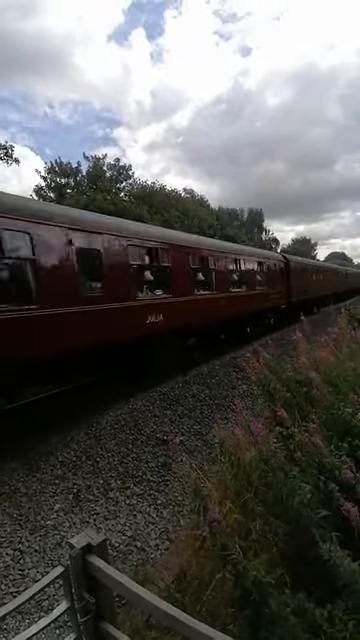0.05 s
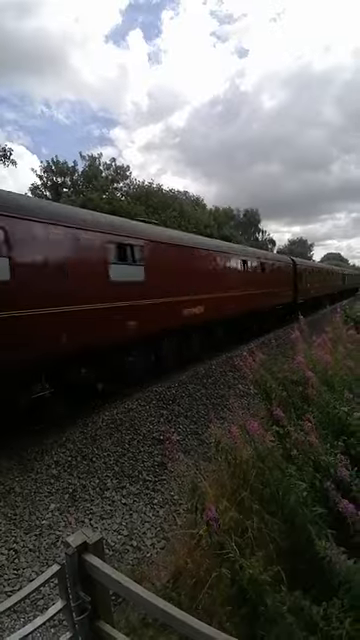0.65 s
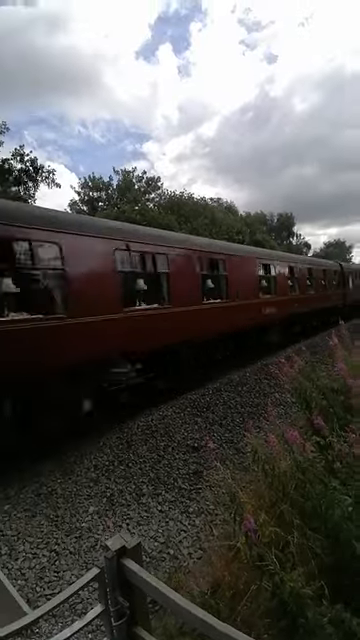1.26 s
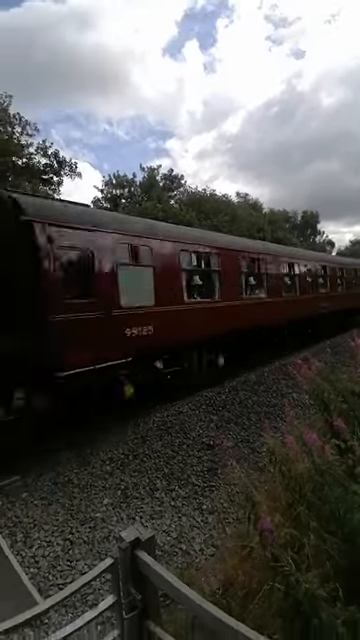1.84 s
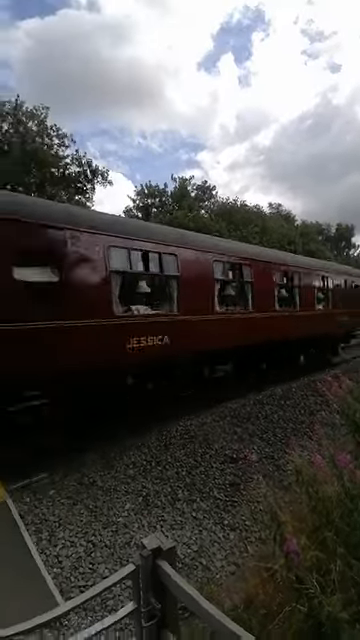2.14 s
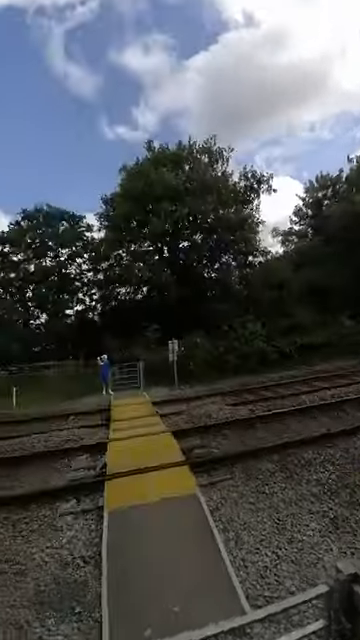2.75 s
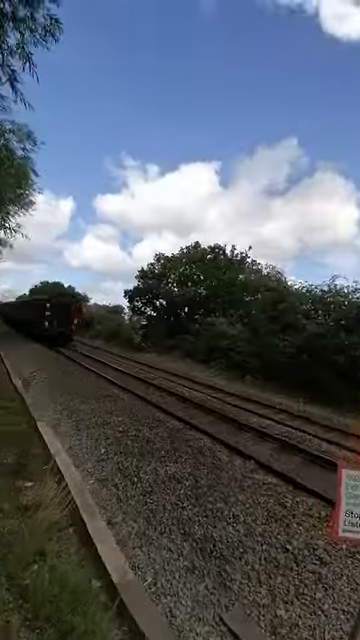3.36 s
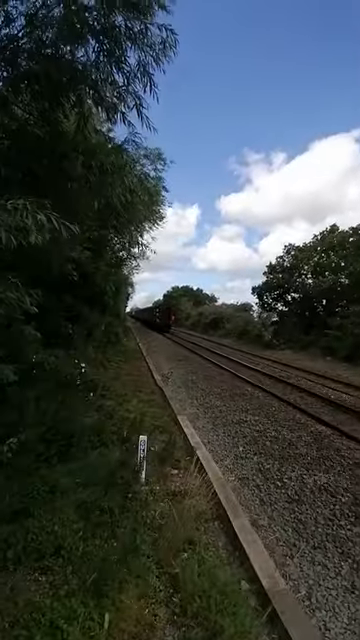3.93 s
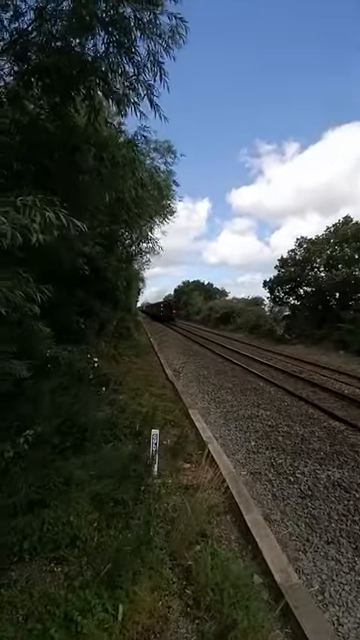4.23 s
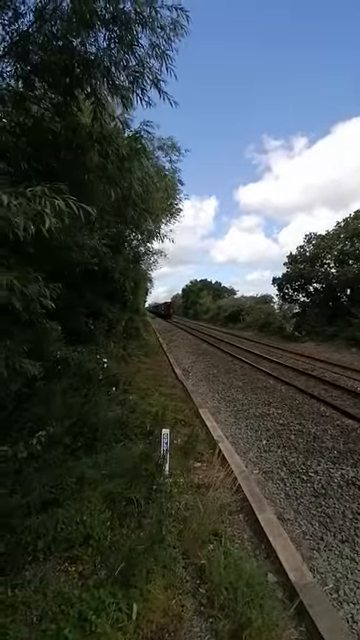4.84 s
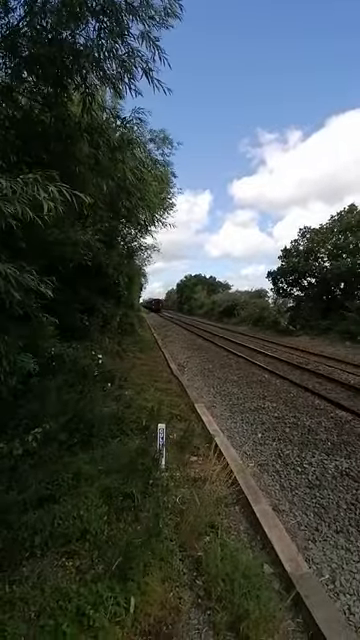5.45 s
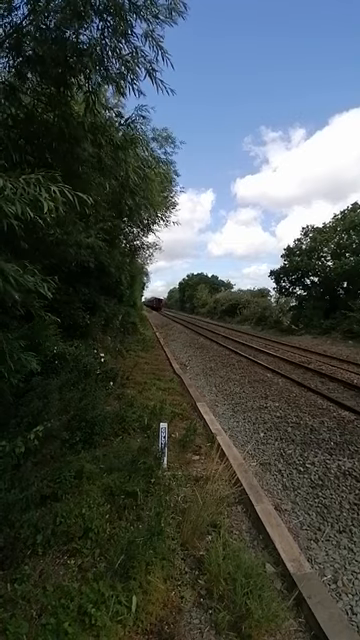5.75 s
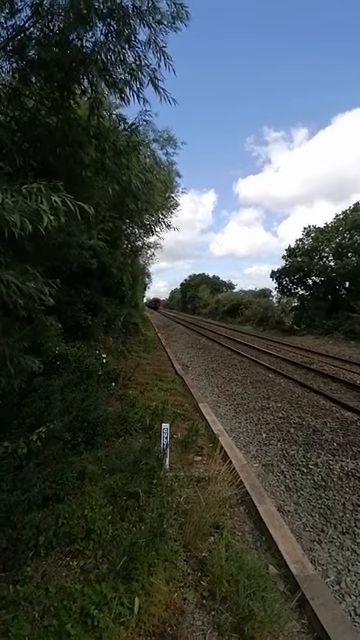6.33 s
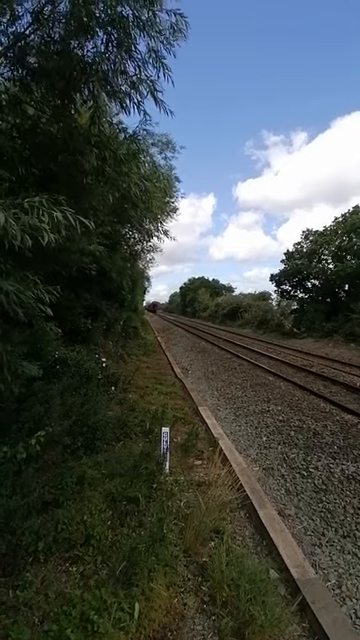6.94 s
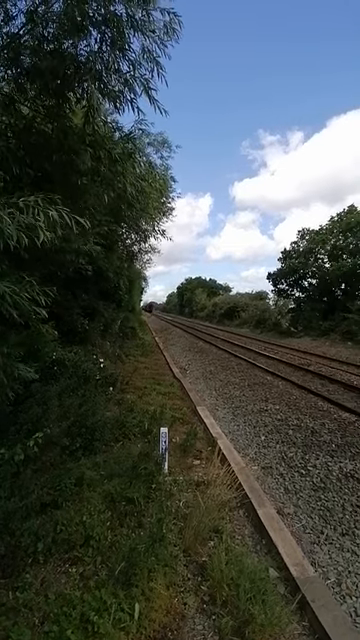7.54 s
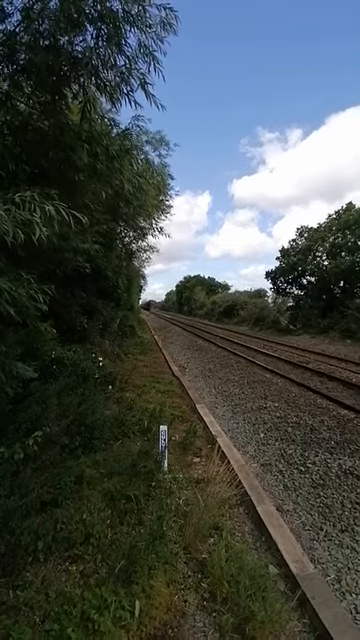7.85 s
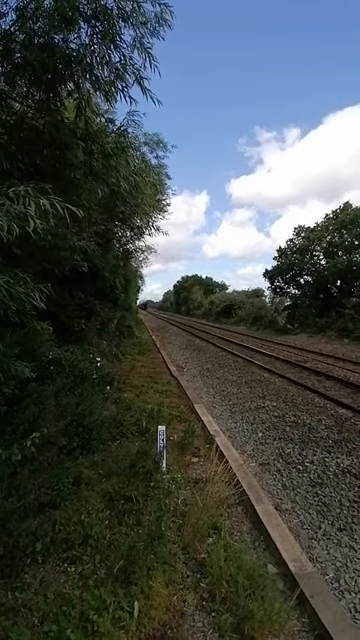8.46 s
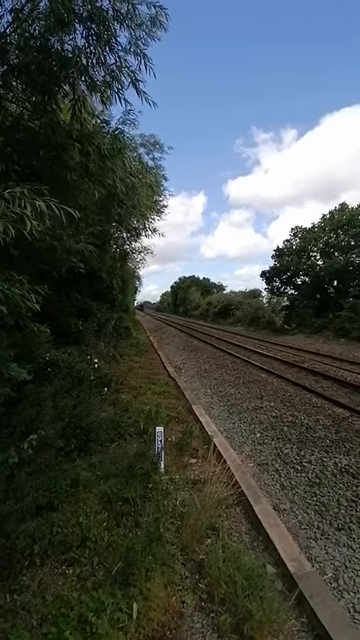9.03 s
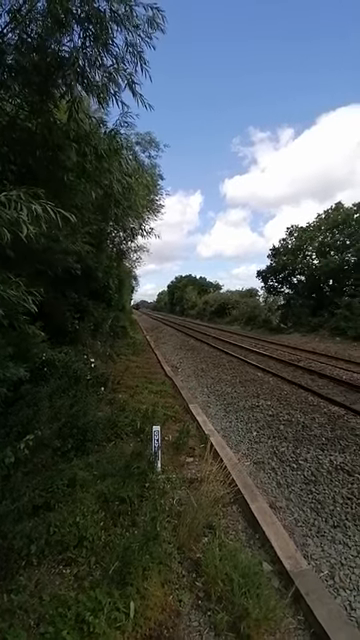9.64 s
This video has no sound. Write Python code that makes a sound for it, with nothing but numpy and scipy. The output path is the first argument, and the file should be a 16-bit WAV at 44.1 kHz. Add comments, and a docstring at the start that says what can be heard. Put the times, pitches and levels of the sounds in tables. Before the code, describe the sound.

Railway coaches rush past a few metres away, roaring and rumbling while their wheels hiss and ring in quick, falling tones. After about three seconds the last coach goes by with a soft boom and a few dull knocks. The noise then dulls and fades along the open track, throbbing slightly while the rails keep singing. Light wind buffets the microphone and is left rumbling beside the distant train.

```python
"""Railway coaches rush past a few metres away, their rough wheels driving rails and sleepers into a roar.
Bogie after bogie sweeps by, its ringing wheels falling in pitch by the Doppler effect.
The end of the last coach booms and the last wheels knock. As the train recedes the sound dulls
and throbs with the turning wheels, while the rails, acting as waveguides, keep singing.
A light wind, buffeting the microphone throughout, is left rumbling beside the distant train."""
import sys
import numpy as np
from scipy import signal
from scipy.fft import irfft, next_fast_len
from scipy.io import wavfile

SR = 44100
rng = np.random.default_rng(int(sys.argv[2]) if len(sys.argv) > 2 else 0)


def store_pcm(level_fs):
    """Save levels as 16-bit WAV."""
    pcm = np.round(np.clip(level_fs, -1, 1) * 32767).astype(np.int16)
    wavfile.write(sys.argv[1], SR, np.atleast_2d(pcm).T)


N = 427329
TIME = np.arange(N) / SR
SIZE = next_fast_len(N, real=True)
HZ = np.maximum(np.arange(SIZE // 2 + 1) * SR / SIZE, 1)
TRAIN_SPEED, SOUND_SPEED = 28.0, 343   # m/s
TRACK_DISTANCE_M, LAST_COACH_S = 4.5, 2.605
RECEDED_M = TRAIN_SPEED * np.maximum(TIME - LAST_COACH_S, 0)

# stereo field beside the train: (frequency [Hz], coherence [0-1], left minus right [dB])
NEAR_IMAGE = [(60, 0.87, 0), (250, 1, -1), (726, 0.95, -3), (1420, 0.44, 1.5), (2340, 0.26, 0.5),
              (3980, 0.01, 2.5), (14000, .05, -2.5)]
# stereo field of the distant train: (frequency [Hz], coherence [0-1], left minus right [dB])
FAR_IMAGE = [(60, .6, 10), (200, 0.95, 7.5), (370, 0.89, -2), (706, 0.85, -1), (1210, 0.58, 0.5),
             (4300, 0.19, -3.5), (8000, .08, 2)]
# phase lead of the right channel, near sound: (frequency [Hz], lead [rad])
NEAR_LEAD = [(60, 0.4), (800, 0.39), (2500, 0.81), (4200, 1.8)]
# phase lead of the right channel, far sound: (frequency [Hz], lead [rad])
FAR_LEAD = [(800, .1), (1100, .4), (1400, 2.37), (1750, 3.44), (2700, 1.3), (3300, 0.3), (4200, 3.9)]

# spectrum of wind on the microphone: (frequency [Hz], level [dB])
WIND_SPECTRUM = [(20, -1), (100, -1), (150, -5), (260, -33.5)]
# puffs of wind: (time [s], half-duration [s], level [dB])
WIND_PUFFS = [(0.142, 0.4, -50), (0.79, 0.38, -43), (2.095, 0.84, -49.5), (3.483, 0.044, -54),
              (4.13, 0.08, -58), (4.55, 0.13, -61), (4.843, 0.052, -54), (5.34, 0.022, -48),
              (5.804, 0.29, -52), (7.0, 0.9, -51.5), (8.367, 0.07, -50), (8.963, 0.087, -54),
              (9.557, 0.044, -49)]
# spectrum of the rumbling coach bodies: (frequency [Hz], level [dB])
BODY_SPECTRUM = [(100, -13.5), (150, -8.5), (210, -3), (480, -11.5)]
# low rumble from down the line: (time [s], level [dB])
FAR_RUMBLE_LEVEL = [(4.3, -61), (5.35, -63.5), (5.9, -52), (7.6, -48.5), (9.69, -52.5)]
# sleepers bouncing on the ballast: (frequency [Hz], half-width [Hz], level [dB])
SLEEPER_MODES = [(466, 92, 1.5), (330, 20, -16)]
# relative levels as coach ends go by, the wheels of each running differently:
# (time [s], body rumble [dB], track roar [dB], wheel hiss [dB], contact sizzle [dB], sleeper drone [dB])
COACH_ENDS = [(.13, -43, -20, -35, -45.5, -31.5), (0.759, -39, -19.5, -29.5, -45, -32.5),
              (1.45, -39, -20, -29.5, -45.5, -39), (2.08, -41, -17.5, -30, -48, -35),
              (2.75, -41, -21, -29, -47.5, -30.5)]
# swells of the distant train: (time [s], half-duration [s], roar boost [dB], rail song boost [dB])
FAR_SWELLS = [(4.4, 0.46, 2, 4), (5.594, 0.44, 2.5, 4.5), (6.42, 0.48, 3, 1), (6.937, 0.24, 3, 2),
              (7.354, 0.38, 3, 2.5)]
# brief throbs of the receding roar: (time [s], boost [dB])
ROAR_THROBS = [(3.53, 3.5), (3.771, 4), (3.96, 1.5), (4.29, 2.5), (5.272, 5), (6.841, 2), (6.941, 1.5),
               (8.245, 4.5)]

# spectrum of the track roar from afar: (frequency [Hz], level [dB])
FAR_ROAR = [(200, -44), (270, -19.5), (380, -31), (440, -14), (600, 0), (700, -5), (800, 0.5), (880, -2.5),
            (970, -10.5), (1020, -10), (1200, -20.5), (1600, -39)]
# resonances of the track: (frequency [Hz], half-width [Hz], level [dB])
TRACK_MODES = [(647, 22, -4.5), (676.4, 10, -1), (737.4, 5, 3.5), (761.6, 26, -1), (949, 13, -5)]
# spectrum of the rail song from afar: (frequency [Hz], level [dB])
FAR_RAIL = [(950, -24), (1130, -6.5), (1400, 1), (1500, -16.5), (1650, -19), (2100, -20)]
# lower rail tones: (frequency [Hz], half-width [Hz], level [dB])
LOW_RAIL_MODES = [(1208, 11, -3), (1220, 24, -2.5)]
# higher rail tones: (frequency [Hz], half-width [Hz], level [dB])
HIGH_RAIL_MODES = [(1362, 13, -3.5), (1408, 10, -8.5), (1444, 9.1, -10), (1870, 8, -19)]
# strength of the higher tones within the rail song: (time [s], level [dB])
HIGH_RAIL_LEVEL = [(4.7, -3.5), (5.0, -14), (5.12, 0.5)]
# spectrum of the wheel hiss from afar: (frequency [Hz], level [dB])
FAR_HISS = [(1200, -22.5), (1550, 5.5), (1900, 1), (2250, -6), (2800, -5.5), (3150, -9.5), (3500, -7.5),
            (4100, -16), (5500, -43.5)]
# spectrum of the contact sizzle from afar: (frequency [Hz], level [dB])
FAR_SIZZLE = [(3300, -22.5), (4200, 0.5), (6350, -4), (7400, -3), (8200, -12.5), (9300, -14), (10200, -21),
              (15000, -27.5)]
# whine carried by the rails: (frequency [Hz], half-width [Hz], level [dB])
FAR_WHINE_MODES = [(6670, 100, 1.5), (6810, 120, 2)]
# rail whine in the far treble, outlasting the airborne sizzle: (time [s], power share [0-1])
WHINE_SHARE = [(3.3, 0.06), (4.4, 0.14), (6.9, 0.5), (7.6, 0.25)]

# spectrum of the track roar alongside: (frequency [Hz], level [dB])
NEAR_ROAR = [(200, -42.5), (330, -18.5), (410, -17.5), (540, -10), (640, -1.5), (750, -2), (850, 3),
             (990, -1), (1200, -9), (1600, -40.5)]
# spectrum of the rail song alongside: (frequency [Hz], level [dB])
NEAR_RAIL = [(950, -53.5), (1170, -6), (1300, 0), (1450, -4), (1580, -9.5), (1900, -28.5)]
# spectrum of the wheel hiss alongside: (frequency [Hz], level [dB])
NEAR_HISS = [(1300, -26.5), (1620, 1.5), (1900, 3), (2400, -8), (3100, -15), (3600, -13), (4200, -20.5),
             (5500, -24.5)]
# spectrum of the contact sizzle alongside: (frequency [Hz], level [dB])
NEAR_SIZZLE = [(3300, -20), (4200, -12), (5700, 2), (6800, -1.5), (9200, -11.5), (10200, -21), (11500, -20),
               (15000, -42.5)]
# thin steel whine alongside: (frequency [Hz], half-width [Hz], level [dB])
NEAR_WHINE_MODES = [(5800, 40, -5.5), (5600, 200, -10.5)]
# high band of the scuffing wheels: (frequency [Hz], half-width [Hz], level [dB])
SCUFF_BAND = [(4740, 830, 0)]
# strength of the scuffing: (time [s], level [dB])
SCUFF_LEVEL = [(.43, -68), (.55, -50), (1.25, -50.5), (2.7, -53), (4.6, -84)]

# knocks of the last wheels: (time [s], level [dB])
WHEEL_KNOCKS = [(2.913, -20), (2.95, -21), (3.235, -20), (3.287, -22), (3.324, -20)]
# howling wheels, and last a broad swell of the distant train's hiss: (time [s], frequency [Hz], half-width
# [Hz], level [dB], half-duration [s])
WHEEL_HOWLS = [(.98, 6700, 650, -50, 0.1), (1.337, 922, 163, -20, 0.2), (2.387, 3880, 170, -47, 0.11),
               (2.687, 2400, 1010, -34, 0.085), (2.983, 990, 150, -24, 0.32), (4.103, 1780, 386, -48, 0.46)]
# ringing wheels: (time [s], frequency [Hz], level [dB], half-duration [s], relative glide [1/s])
WHEEL_RINGS = [(0.25, 1300, -20.5, 0.018, -0.056), (0.517, 1480, -26, 0.052, -0.14),
               (1.097, 3360, -38, 0.1, -0.12), (1.381, 1354, -18.5, 0.088, -0.07),
               (1.55, 3480, -42, 0.043, -.15), (1.888, 1457, -16.5, 0.032, -0.5),
               (2.26, 3460, -39, .04, -0), (2.483, 2500, -36, .045, -.3), (2.601, 3610, -37, 0.04, -0.4),
               (2.873, 1007, -22.5, 0.11, 0.026)]
# boom of the last coach's end wall: (frequency [Hz], half-width [Hz], level [dB])
END_WALL_MODES = [(203, 22, -9.5), (278, 17, -0.5), (328, 54, -7.5)]
# resonances of a wheel: (frequency [Hz], half-width [Hz], level [dB])
WHEEL_MODES = [(736, 100, -7), (830, 31, -10.5), (1393, 41, 4.5), (3850, 29, -11.5)]
# bright rush of a wheel: (frequency [Hz], half-width [Hz], level [dB])
WHEEL_RUSH_BANDS = [(2450, 460, 5.5), (3250, 560, -10.5)]
# bogies at closest approach: (time [s], ring level [dB], rush level [dB])
BOGIE_PASSES = [(.1, -39, -34), (.6, -30.5, -30.5), (.76, -29.5, -40), (1.15, -31, -32), (1.44, -28, -35),
                (1.999, -30, -50), (2.71, -31.5, -33.5)]


def from_db(db):
    """Amplitude grows tenfold for every 20 dB."""
    return 10 ** (np.asarray(db) / 20)


def rms_one(x):
    """Normalisation to unit mean power."""
    return x / np.sqrt(np.mean(x ** 2) + 1e-20)


def over_floor(db, floor_db):
    """Incoherent addition: the powers of a fading and a steady sound add; result in dB."""
    return 20 * np.log10(np.hypot(from_db(db), from_db(floor_db)))


def bell(at_s, half_s):
    """A Gaussian envelope of height 1, down to 1/e at half_s either side."""
    return np.exp(-np.minimum(((TIME - at_s) / half_s) ** 2, 20))


def in_time(rows):
    """Linear interpolation of each column over time."""
    times, *columns = np.transpose(rows)
    return [np.interp(TIME, times, column) for column in columns]


def in_pitch(rows):
    """Interpolation of each column over logarithmic frequency."""
    hz, *columns = np.transpose(rows)
    return [np.interp(np.log(HZ), np.log(hz), column) for column in columns]


def colour(points):
    """A spectral envelope as gain, with Butterworth roll-off past both ends."""
    ends = (1 + (points[0][0] / HZ) ** 8) * (1 + (HZ / points[-1][0]) ** 8)
    return from_db(in_pitch(points)[0]) / np.sqrt(ends)


def resonances(modes):
    """Modal superposition: the gain of steep-sided peaks whose powers add."""
    peaks = (from_db(db) / (1 + ((HZ - hz) / width) ** 2) for hz, width, db in modes)
    return np.sqrt(sum(peak ** 2 for peak in peaks))


def white():
    """A white noise spectrum: equal mean power and random phase at every frequency."""
    return rng.standard_normal(len(HZ)) + 1j * rng.standard_normal(len(HZ))


def noise(gain):
    """Source and filter: white noise shaped by a gain at each frequency; rms 1."""
    return rms_one(irfft(gain * white(), SIZE)[:N])


def flutter(rate_hz):
    """Random modulation: low-pass noise of rms 1."""
    return noise(1 / (1 + (HZ / rate_hz) ** 2))


def image(table, lead):
    """Partial coherence: channel weights of direct sound and of sound scattered by ballast and trees."""
    coherence, balance_db = in_pitch(table)
    coherence = np.clip(coherence, 0, 1)
    side = np.array([[.5], [-.5]])
    pan = from_db(side * balance_db)
    phase = np.exp(-1j * side * in_pitch(lead)[0])
    return pan * np.sqrt(coherence) * phase, pan * np.sqrt(1 - coherence)


def stereo_noise(gain, place):
    """Superposition of shared direct noise and independent scattered noise; the channel mean has rms 1."""
    direct, scattered = place
    spectra = direct * white() + scattered * np.array([white(), white()])
    pair = irfft(gain * spectra, SIZE)[:, :N]
    return pair / pair.mean(axis=0).std()


def late_left(x, lag_ms):
    """Path difference: sound from the right reaches the left channel later."""
    return np.array([np.interp(TIME - lag_ms / 1000, TIME, x), x])


def wind(place, breeze_db=-64.5, buffet_db=3.0):
    """Turbulent pressure: puffs over a light breeze buffet the microphone."""
    puff_power = sum((from_db(db) * bell(s, half)) ** 2 for s, half, db in WIND_PUFFS)
    envelope = np.sqrt(from_db(breeze_db) ** 2 + puff_power) * from_db(buffet_db * flutter(8.9))
    return envelope * stereo_noise(colour(WIND_SPECTRUM), place)


def fade_db(hold_m, loss_db):
    """Attenuation with distance: past hold_m, loss_db is lost each time the last coach is twice as far."""
    return -loss_db * np.log2(np.hypot(1, RECEDED_M / hold_m))


def far_rumble(place):
    """Low frequencies carry far: the coach bodies rumble from down the line."""
    return from_db(in_time(FAR_RUMBLE_LEVEL)[0]) * stereo_noise(colour(BODY_SPECTRUM), place)


def coach_rumble(place, between_db=-53):
    """Structure-borne sound: the coach bodies rumble, most where their ends ride on the bogies."""
    between = from_db(between_db + fade_db(hold_m=10, loss_db=6.64))
    end_power = sum((from_db(db) * bell(s, half_s=0.2)) ** 2 for s, db, *_ in COACH_ENDS)
    return np.sqrt(between ** 2 + end_power) * stereo_noise(colour(BODY_SPECTRUM), place)


def sleeper_drone(place):
    """Mass-spring resonance: the sleepers bounce on the ballast."""
    drone_db = in_time(COACH_ENDS)[-1] + fade_db(hold_m=9.4, loss_db=6.36)
    return from_db(drone_db) * stereo_noise(resonances(SLEEPER_MODES), place)


def rolling_levels():
    """Frequency-dependent attenuation: roar, rail song, hiss and sizzle each fade at their own rate."""
    _, roar_db, hiss_db, sizzle_db, _ = in_time(COACH_ENDS)
    roar_swell_db, rail_swell_db = sum(np.outer(dbs, bell(s, half)) for s, half, *dbs in FAR_SWELLS)
    throb_db = sum(db * bell(s, half_s=.033) for s, db in ROAR_THROBS)
    roar_db = roar_db + fade_db(hold_m=10.65, loss_db=4.95) + roar_swell_db + throb_db
    rail_db = -27.5 + fade_db(hold_m=9.7, loss_db=5.16) + rail_swell_db
    # hiss and sizzle sink into the faint rustle of the trees
    hiss_db = over_floor(hiss_db + fade_db(hold_m=9.5, loss_db=9), floor_db=-57)
    sizzle_db = over_floor(sizzle_db + fade_db(hold_m=10, loss_db=6.64), floor_db=-73.5)
    return roar_db, rail_db, hiss_db, sizzle_db


def far_roar(place, turn_hz=9.05, beat_db=0.9, crest_s=6.84):
    """Amplitude modulation: an out-of-round wheel swells the resonant track's roar once a turn."""
    track = stereo_noise(colour(FAR_ROAR), place) + stereo_noise(resonances(TRACK_MODES), place)
    turning = np.cos(2 * np.pi * turn_hz * (TIME - crest_s))
    return from_db(beat_db * turning) * track


def rail_song(place):
    """Guided waves: the rails carry narrow bands back along their length."""
    low = from_db(-6.0) * noise(resonances(LOW_RAIL_MODES))
    high = from_db(in_time(HIGH_RAIL_LEVEL)[0]) * noise(resonances(HIGH_RAIL_MODES))
    broad = from_db(-5.5) * stereo_noise(colour(FAR_RAIL), place)
    return late_left(low + high, lag_ms=0.21) + broad


def far_rolling(place, roar_db, rail_db, hiss_db, sizzle_db):
    """Scintillation: moving air on the long path makes roar, rail song and treble waver over a hiss."""
    roar = from_db(roar_db - 1.25) * far_roar(place)
    song = from_db(rail_db) * rail_song(place)
    hiss = from_db(hiss_db) * stereo_noise(colour(FAR_HISS), place)
    whine_share = in_time(WHINE_SHARE)[0]
    sizzle = np.sqrt(1 - whine_share) * stereo_noise(colour(FAR_SIZZLE), place)
    whine = np.sqrt(whine_share) * stereo_noise(resonances(FAR_WHINE_MODES), place)
    shimmer = from_db(0.56 * flutter(13))
    return shimmer * (roar + song + from_db(sizzle_db) * (sizzle + whine)) + hiss


def near_rolling(place, roar_db, rail_db, hiss_db, sizzle_db):
    """Roughness excitation: many close wheels make a broad roar, bright hiss and scuff, and a whine."""
    roar = from_db(roar_db + 0.72 * flutter(22)) * stereo_noise(colour(NEAR_ROAR), place)
    song = from_db(rail_db) * stereo_noise(colour(NEAR_RAIL), place)
    hiss = from_db(hiss_db + .5 * flutter(12)) * stereo_noise(colour(NEAR_HISS), place)
    scuff = from_db(in_time(SCUFF_LEVEL)[0]) * stereo_noise(resonances(SCUFF_BAND), place)
    sizzle = stereo_noise(colour(NEAR_SIZZLE), place)
    whine = from_db(-4.0) * stereo_noise(resonances(NEAR_WHINE_MODES), place)
    return roar + song + hiss + scuff + from_db(sizzle_db - 2.0) * (sizzle + whine)


def wheel_knocks(place):
    """Impact excitation: each dull blow of a wheel sets the track roaring for an instant."""
    blows = sum(from_db(db) * bell(s, half_s=0.0073) for s, db in WHEEL_KNOCKS)
    return blows * stereo_noise(colour(NEAR_ROAR), place)


def wheel_howls(place):
    """Broad resonance: passing wheels howl in bands that swell out of the roar and sink back; later the distant
    train's hiss swells once in a broad band."""
    out = np.zeros((2, N))
    for s, hz, width, db, half_s in WHEEL_HOWLS:
        band = resonances([(hz, width, 0)]) ** 2
        out += from_db(db) * bell(s, half_s) * stereo_noise(band, place)
    return out


def wheel_rings(rough_db=5.5, waver_share=0.01205):
    """Modulated resonance: wheels ring in short gliding tones, roughened by uneven rail contact."""
    out = np.zeros(N)
    waver = waver_share * flutter(73.4)
    contact = rms_one(from_db(rough_db * np.clip(flutter(60), -2, 2)))
    for s, hz, db, half_s, glide in WHEEL_RINGS:
        pitch_hz = hz * (1 + glide * np.clip(TIME - s, -1, 1) + waver)
        out += from_db(db) * bell(s, half_s) * np.sin(2 * np.pi * np.cumsum(pitch_hz) / SR)
    return late_left(out * contact, lag_ms=0.026)


def drive_by(modes, closest_s, falloff):
    """Doppler effect and spreading: a changing path makes ringing swell, drop in pitch and fade."""
    path_m = np.hypot(TRACK_DISTANCE_M, TRAIN_SPEED * (TIME - closest_s))
    delay_s = (path_m - TRACK_DISTANCE_M) / SOUND_SPEED
    heard = np.interp(TIME - delay_s, TIME, noise(resonances(modes)))
    return heard * (TRACK_DISTANCE_M / path_m) ** falloff


def bogies(boom_db=-32.5):
    """Moving sources: each bogie's wheels ring and rush past, and the end of the last coach booms."""
    out = from_db(boom_db) * drive_by(END_WALL_MODES, LAST_COACH_S, falloff=3.1)
    for s, ring_db, rush_db in BOGIE_PASSES:
        out += from_db(ring_db) * drive_by(WHEEL_MODES, s, falloff=1.46)
        # treble beams sideways, so it is brief
        out += from_db(rush_db) * drive_by(WHEEL_RUSH_BANDS, s, falloff=1.6)
    return late_left(out, lag_ms=0.078) * from_db([[-1.2], [1.2]])


def far_share(least=0.021, most=0.89, midpoint_m=22.4, blend_m=7.3):
    """Logistic transition: the far sound's share of power grows once the last coach is clear."""
    turned = .5 + .5 * np.tanh(.5 * (RECEDED_M - midpoint_m) / blend_m)
    return least + (most - least) * turned


def scene():
    """Superposition: the near train yields to the far one in an equal-power blend, over drone and wind."""
    near, far = image(NEAR_IMAGE, NEAR_LEAD), image(FAR_IMAGE, FAR_LEAD)
    levels, gone = rolling_levels(), far_share()
    close = near_rolling(near, *levels) + coach_rumble(near)
    distant = far_rolling(far, *levels) + far_rumble(far)
    rolling = np.sqrt(1 - gone) * close + np.sqrt(gone) * distant + sleeper_drone(near)
    wheels = bogies() + wheel_knocks(near) + wheel_rings() + wheel_howls(near)
    return wind(near) + rolling + wheels


def record(dry, fade_in_s=.003, cutoff_hz=15000):
    """Band limiting: after a soft start, an elliptic low-pass cuts the top steeply."""
    fade_in = np.minimum(TIME / fade_in_s, 1)
    low_pass = signal.ellip(12, .1, 90, cutoff_hz, fs=SR, output="sos")
    return signal.sosfilt(low_pass, dry * fade_in)


dry = scene()
out = record(dry)
store_pcm(out)
```